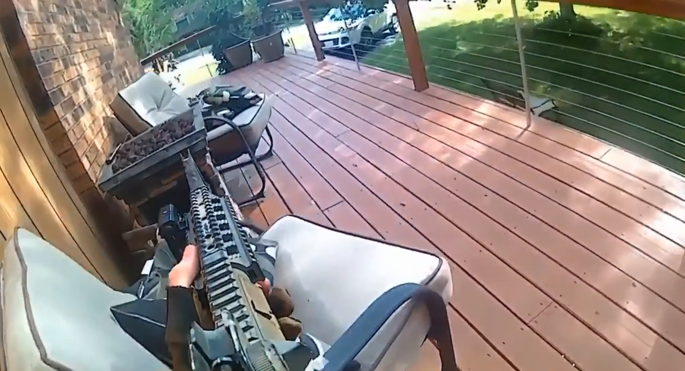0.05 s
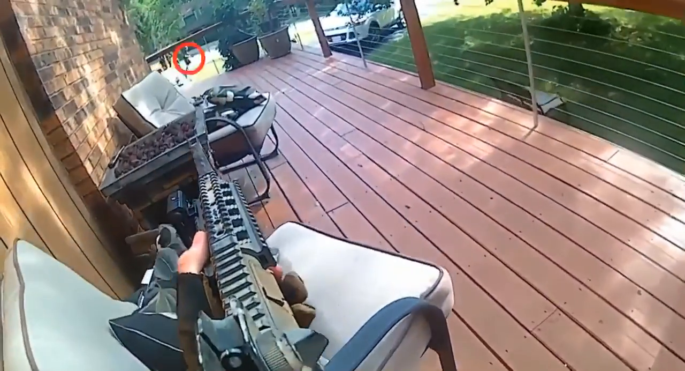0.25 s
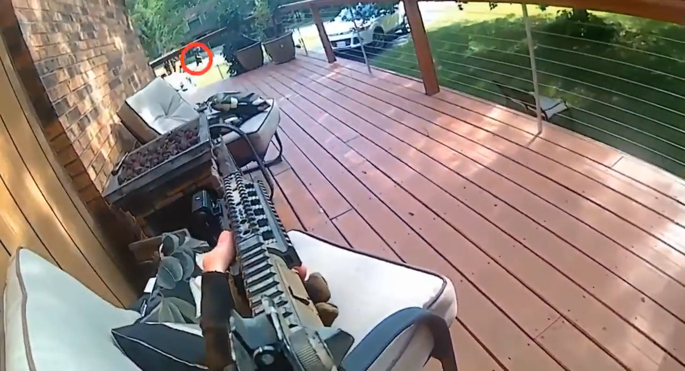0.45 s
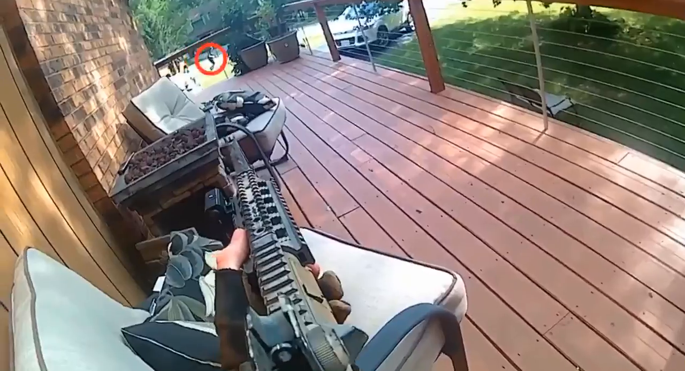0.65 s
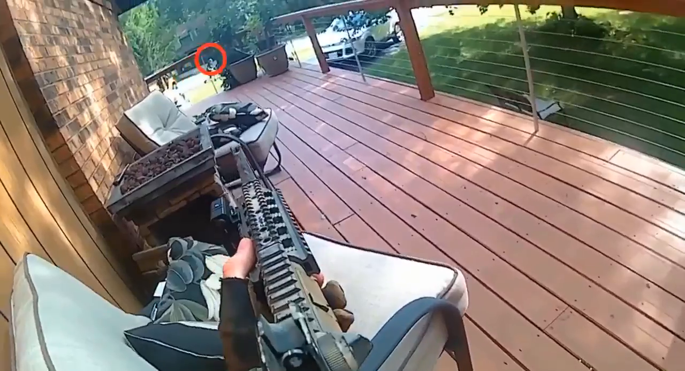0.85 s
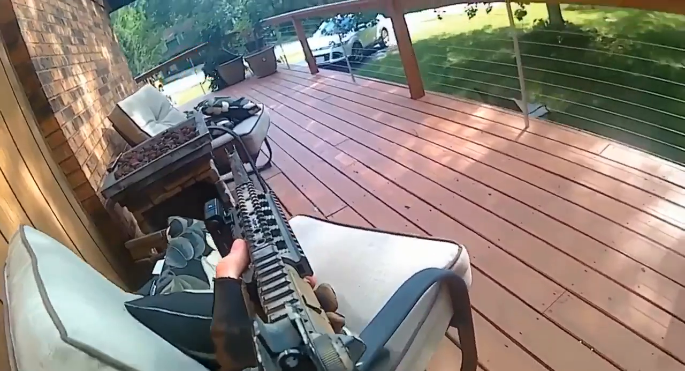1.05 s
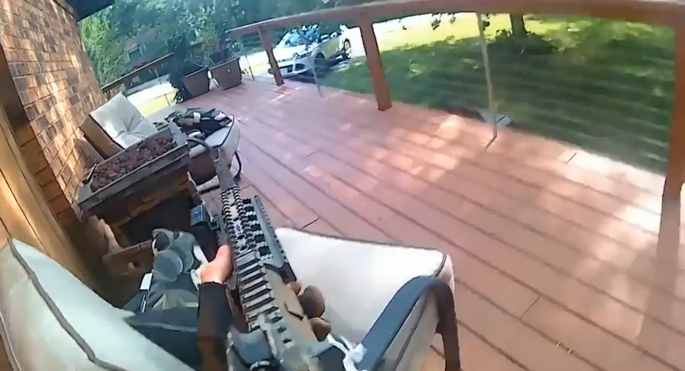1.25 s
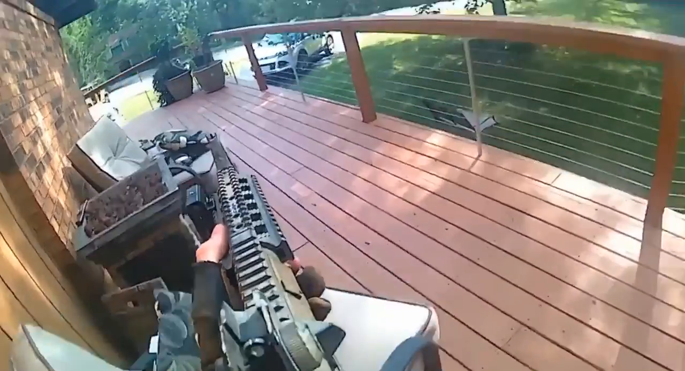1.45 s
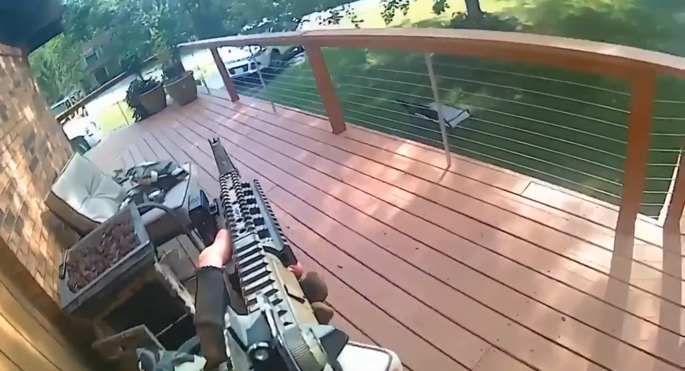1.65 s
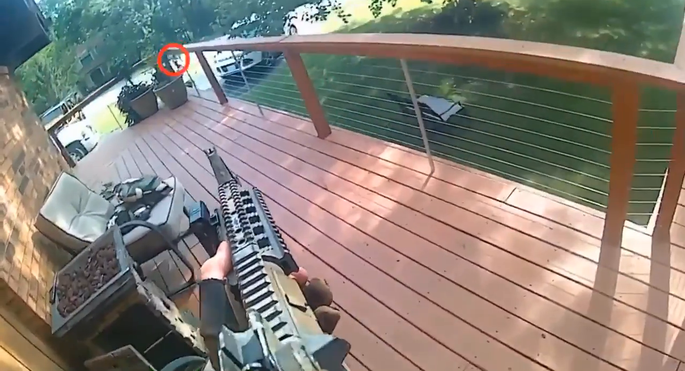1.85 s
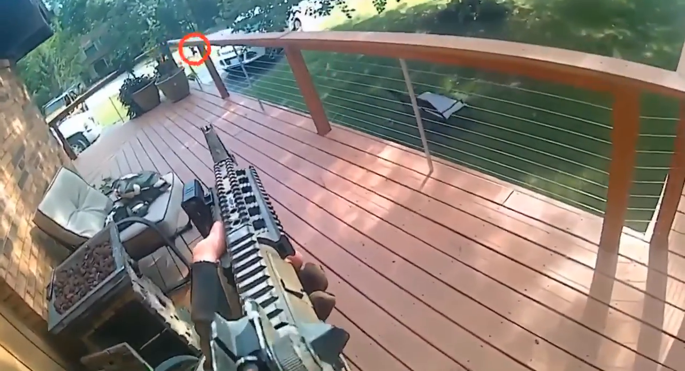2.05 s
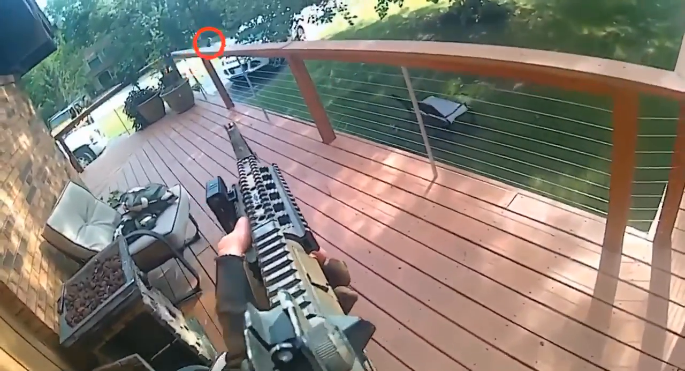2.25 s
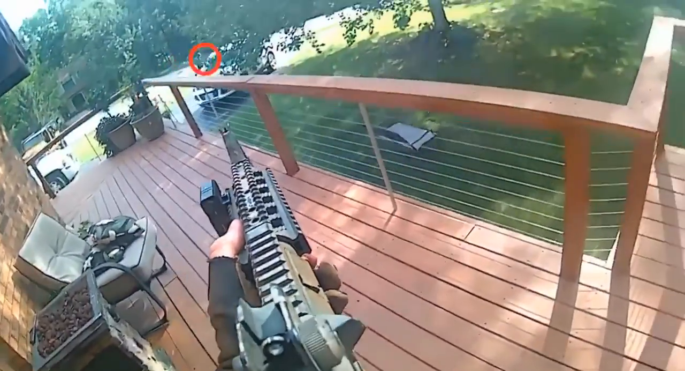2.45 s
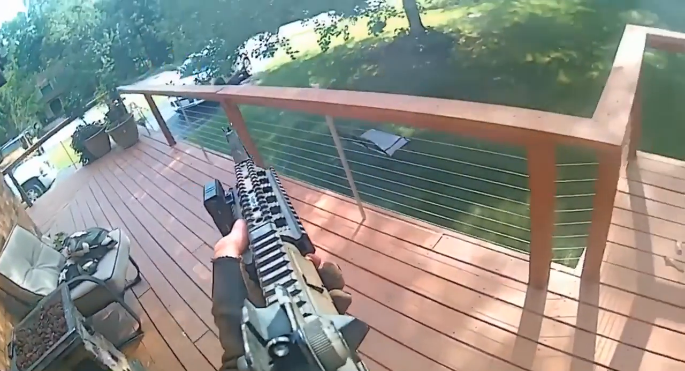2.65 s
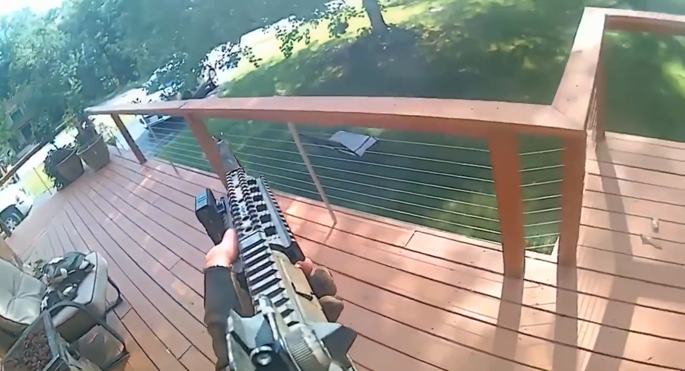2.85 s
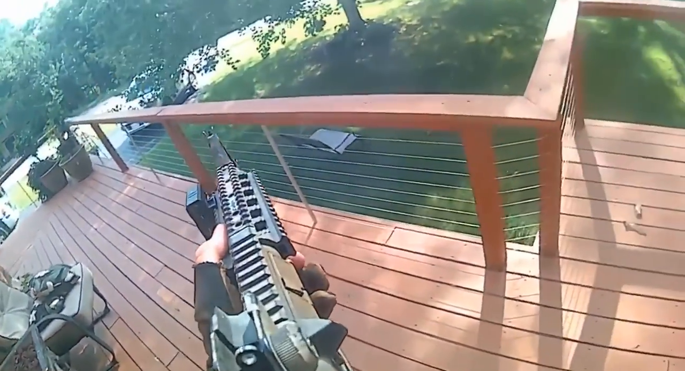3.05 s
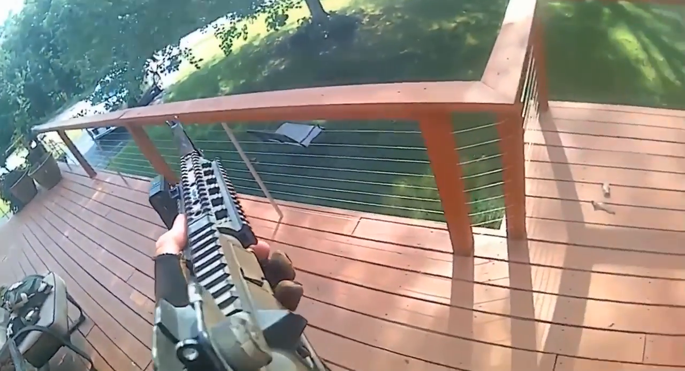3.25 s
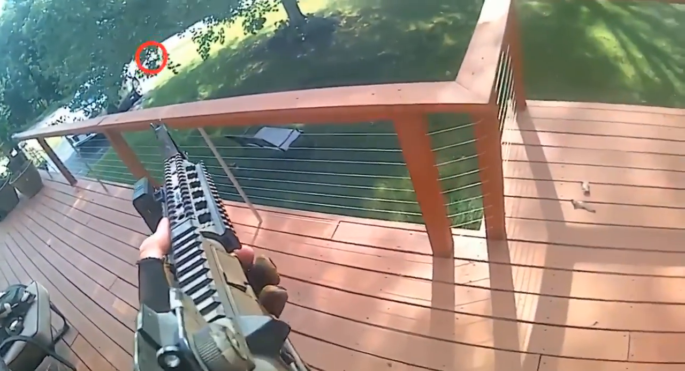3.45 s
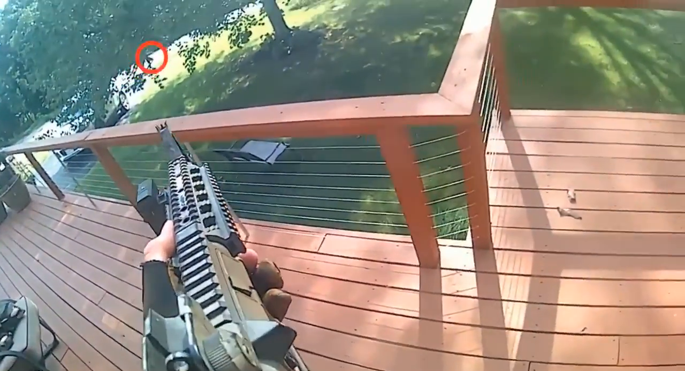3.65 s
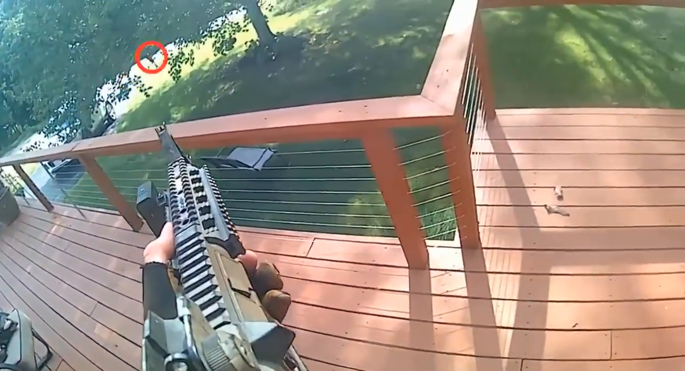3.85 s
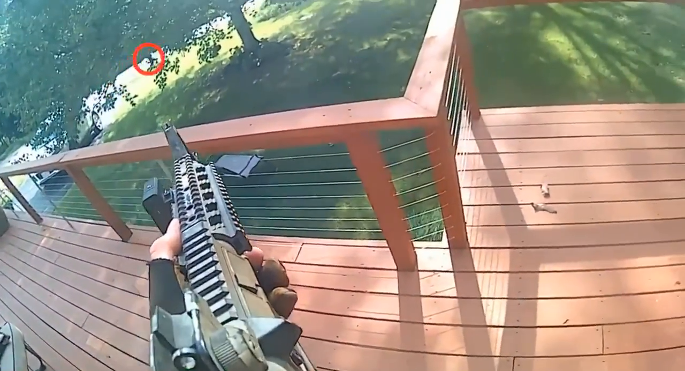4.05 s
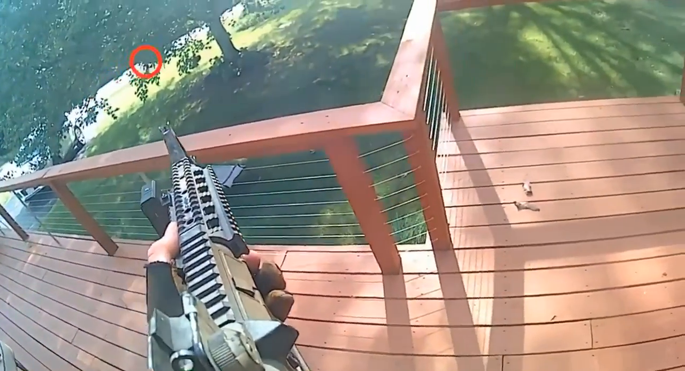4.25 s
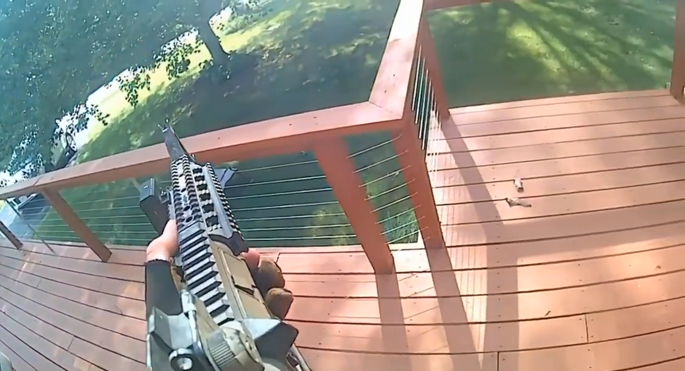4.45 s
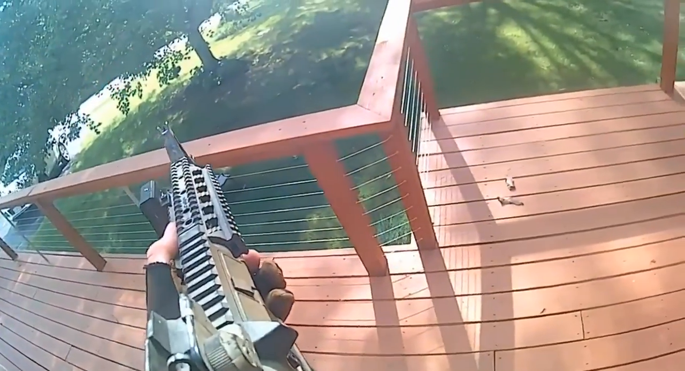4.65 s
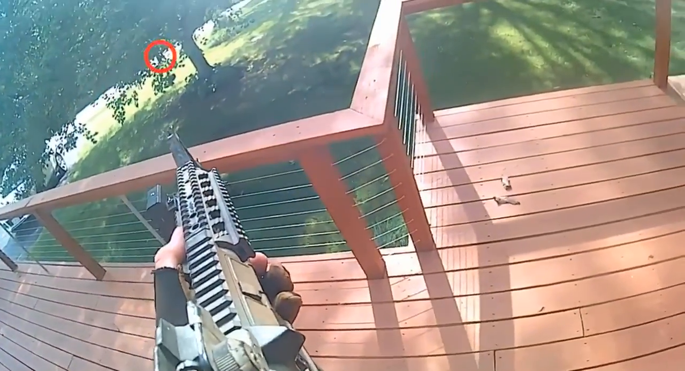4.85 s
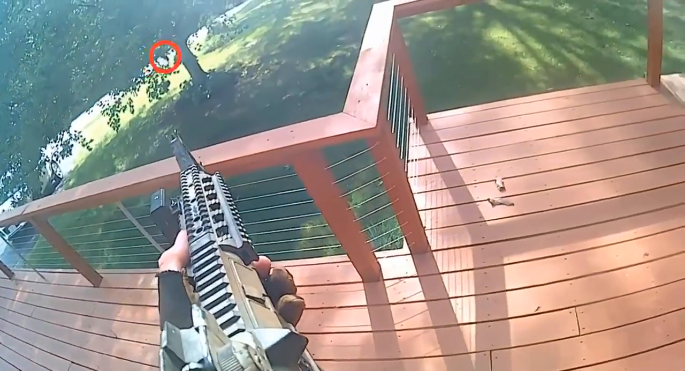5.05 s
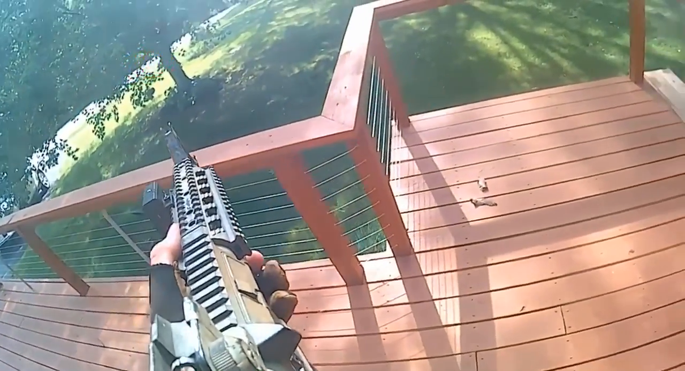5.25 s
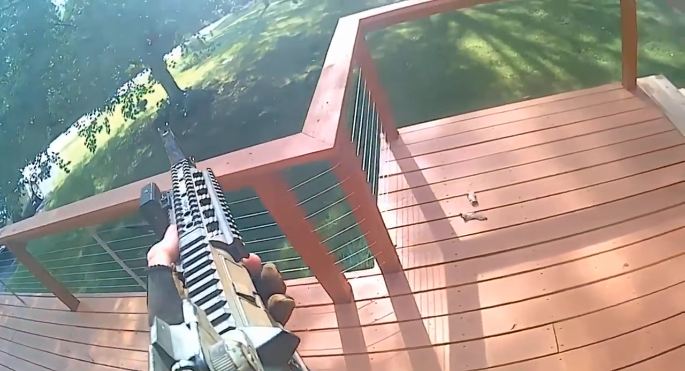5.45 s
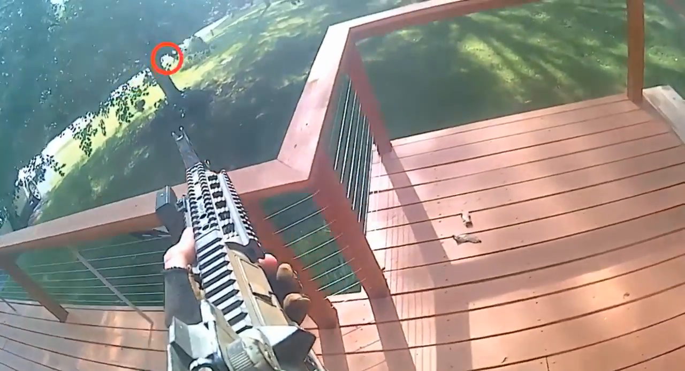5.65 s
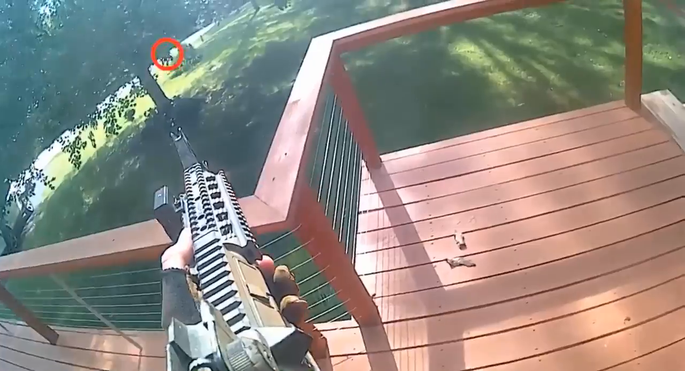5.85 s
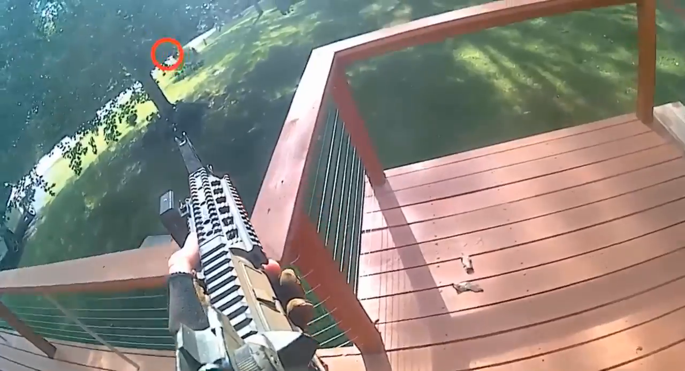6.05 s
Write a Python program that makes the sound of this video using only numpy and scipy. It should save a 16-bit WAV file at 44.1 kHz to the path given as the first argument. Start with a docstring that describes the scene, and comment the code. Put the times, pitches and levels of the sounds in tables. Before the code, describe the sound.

Four strings of dry, plasticky slams with geared motor whine, about five shots a second, very close and slightly overloaded. Between the first two strings the gun is handled: trigger clacks, dull thuds, a small loose rattle. Later pauses are nearly empty, just quiet rumble and thin hiss. The sound is boxy and narrow, with a gritty metallic edge in the treble and only a short, faint answer from deck boards and house wall.

```python
"""Four quick strings of hard slams and pops with whining gears: an electric airsoft rifle on a wooden deck.
The microphone is a head-worn camera's, close above the gun. In each cycle the motor whines up, the piston
slams, the barrel pops and the gears coast: swept tones, grinding noise, noise cracks and struck modes.
Clacks fall among the shots, soft bumps between the first two strings; a low rumble and a hiss lie behind.
The input overloads on the slams, and 8 kHz sampling mirrors the band into the treble."""
import sys
import numpy as np
from scipy import signal
from scipy.fft import rfft, irfft, next_fast_len
from scipy.io import wavfile
from scipy.ndimage import map_coordinates

SR = 44100
rng = np.random.default_rng(int(sys.argv[2]) if len(sys.argv) > 2 else 0)


def generate_wav(sig):
    """Save sig (samples, or channels by samples) to the path in sys.argv[1] as 16-bit PCM at SR."""
    pcm = np.round(np.clip(np.atleast_2d(sig).T, -1, 1) * 32767).astype(np.int16)
    wavfile.write(sys.argv[1], SR, pcm)


N = 269892  # samples

# Levels in the tables are relative: each source sets its own gain on top.
# Slow level curve shared by rumble and hiss, rising as the wearer moves: [t/s, level/dB]
BACKGROUND_LEVEL = [(0.0, -30), (1.11, -25), (1.36, -28), (1.94, -27), (3.1, -34.5), (3.83, -26.5),
                    (4.59, -29), (5.06, -35), (5.56, -26), (6.12, -29)]
# Colour of the low rumble and of the faint hiss: [f/Hz, density/dB per Hz]
RUMBLE_SPECTRUM = [(20, -37), (40, -12.5), (62, 5), (110, 2.5), (150, -4), (200, -4.5), (250, -18.5),
                   (320, -27.5), (600, -32), (1500, -81)]
HISS_SPECTRUM = [(100, -44), (400, -14), (800, -4.5), (1500, -7.5), (2100, -9), (2700, -17), (3300, -22),
                 (4000, -26.5)]
# Decay of the answer from boards and house wall: [f/Hz, t60/s]
DECK_DECAY = [(100, 0.21), (500, 0.15), (1500, 0.16), (4000, 0.045)]

# Clacks of trigger and grip: [t/s, click level/dB, knock level/dB]
CLACKS = [(.985, -16, -19.5), (1.067, -31, -20), (1.899, -17.5, -23), (2.092, -21, -19),
          (2.281, -19.5, -26.5), (3.656, -19.5, -25.5), (4.744, -23, -25.5)]
# Soft bumps against the body: [t/s, tick level/dB, thud level/dB, thud f/Hz before its sag]
BUMPS = [(1.077, -37, -15, 200), (1.155, -45, -21, 112), (1.189, -54, -11.5, 103),
         (1.2421, -17.5, -16, 160), (1.3063, -14.5, -10.5, 164), (1.403, -25.5, -21, 133)]
# Modes of the loose fitting and of the hollow grip: [f/Hz, level/dB, t60/s]
FITTING_MODES = [(813, 0, 0.037), (1280, 0, 0.039), (1561, -6, 0.033), (1920, -8, .04)]
GRIP_MODES = [(240, -3.5, 0.18), (339.7, 0.5, 0.097), (455, 0.5, 0.034)]
# Colour of a click: [f/Hz, density/dB per Hz]
CLICK_SPECTRUM = [(200, -7), (780, -4.5), (1450, 5.5), (2100, -3), (2600, -32), (3200, -16.5), (4000, -39)]

# Every shot: [t/s of the slam, slam level/dB, low boom level/dB]
SHOTS = [(.184, -10.5, -20), (0.3704, -8, -24), (0.5519, -9.5, -23), (0.7287, -12, -22),
         (0.8871, -9.5, -28), (1.5887, -10, -23.5), (1.788, -11, -20.5), (1.9837, -10, -14.5),
         (2.1774, -9.5, -17), (3.5452, -13.5, -22.5), (3.746, -11, -21), (3.9361, -10, -37),
         (4.1141, -8, -37), (4.2925, -8.5, -29), (4.471, -9, -27), (4.6339, -8.5, -25.5),
         (5.3218, -12.5, -28), (5.5455, -12.5, -22.5), (5.7486, -9, -23), (5.947, -10, -35),
         (6.133, -21, -22)]
# Modes of the barrel's air and of the receiver's shell: [f/Hz, level/dB, t60/s]
BARREL_MODES = [(215, -3, .04), (365, -11, .09), (730, -7, .024), (985, -2, .032), (1275, 0, .032),
                (1490, -6, .04), (1895, -12, .03), (2125, -12, .032)]
SHELL_MODES = [(1260, -3, .012), (1900, -5, .015), (2130, -6, .015), (2650, 0, .014), (2880, -1, .014),
               (3170, -7, .013)]
# Colour of the slam's crack, and of the gearbox noise and resonances: [f/Hz, density/dB per Hz]
SLAM_SPECTRUM = [(100, -49.5), (450, -10), (750, 5.5), (1250, -11), (1650, 0), (2050, -38.5), (2350, 0.5),
                 (2700, 1.5), (2950, -6), (3300, -10.5), (3600, -26), (4000, -9)]
GEARBOX_SPECTRUM = [(100, -43), (230, -14.5), (370, -1.5), (520, -15), (720, -19.5), (1000, -10),
                    (1250, -6), (1480, -2.5), (1650, -7.5), (2100, -9.5), (2260, -11.5), (2400, -23.5),
                    (2750, -14), (3150, -10.5), (3320, -15.5), (3480, -32.5), (3800, -21)]
# Gear tones: [multiple of the shaft rate, level/dB]
GEAR_TONES = [(1, -13.5), (2, -19.5), (3, -8.5), (4, 1.5), (5, -8.5), (6, -16.5), (7, -16), (8, 3),
              (9, -18.5)]

# What the camera's coarse interpolation lets through: [f/Hz, level/dB]
IMAGE_RESPONSE = [(3900, 0), (4750, -1), (6000, -19), (7400, -34), (7750, -54), (8000, -72), (8250, -56),
                  (8600, -38), (10000, -28), (11200, -16), (12800, -18), (14400, -37), (15400, -36),
                  (15900, -70)]
SAMPLE_HZ, TOP_HZ = 8000, 16400

# Gains on the background level; the hiss swings wider in dB than the rumble
RUMBLE_DB, HISS_DB, HISS_SWING = 2, -24, 1.1
CLACK_T60_S, TICK_T60_S, TICK_KNOCK_DB = 0.028, 0.0036, -13
CLINK_S, CLINK_DB = 1.152, -23

# The motor starts PULL_S before the slam; run-up and coasting are time constants
PULL_S, RUN_UP_S, SHAFT_HZ, COAST_S = 0.077, 0.02, 432.5, 0.2
# Grinding: level at the slam, growth as the spring is squeezed, fall while coasting
GRIND_DB, LOAD_DB_PER_S, GRIND_FALL_DB_PER_S = -26, 67.5, 73
SHAKE_DB, SHAKE_T60_S = -18, 0.055  # the slam shakes the gear train
# Whine: level, growth of overtones with speed, loss under load and the time that loss takes
WHINE_DB, BRIGHTEN, STRAIN_DB, STRAIN_S = -21.5, 0.34, 14.5, 0.031
FREE_DB, WHINE_FALL_DB_PER_S = -31, 66.5  # whine once the spring lets go
STOP_S, STOP_T60_S = 0.12, 0.26  # after the slam, the gears come to rest
SPRING_HZ, SPRING_DB, SPRING_T60_S = 1466, -22.5, 0.32  # the stopping gears damp it further
# Dull knocks: the piston slips off the gear before the slam and rebounds after it
SLIP_S, SLIP_DB, REBOUND_S, REBOUND_DB = 0.00634, -11, 0.039, -14.5


def amp(db):
    """Amplitude of a level in dB."""
    return 10 ** (np.asarray(db) / 20)


def unit(x):
    """Scale to rms 1."""
    return x / np.sqrt(np.mean(x ** 2) + 1e-20)


def along(points, hz):
    """Read (Hz, value) points on a log frequency axis."""
    f, v = np.transpose(points)
    return np.interp(np.log(hz + 1), np.log(f + 1), v)


def filtered(x, response):
    """Multiply the spectrum of x by a function of frequency."""
    m = next_fast_len(len(x) + 8192)
    spectrum = rfft(x, m) * response(np.fft.rfftfreq(m, 1 / SR))
    return irfft(spectrum, m)[:len(x)]


def noise(spectrum, size):
    """Steady coloured noise of rms 1."""
    return unit(filtered(rng.standard_normal(size), lambda hz: amp(along(spectrum, hz))))


def wobble(size, rate):
    """A smooth random curve of rms about 1, with rate knots a second."""
    knots = rng.standard_normal(int(size * rate / SR) + 4)
    return map_coordinates(knots, [np.arange(size) * rate / SR])


def fade(t, attack, t60):
    """A blow's envelope: silent before t = 0, a quick rise, an even decay."""
    t = np.maximum(t, 0)
    return (1 - np.exp(-t / attack)) * amp(-60 * t / t60)


def burst(spectrum, t, attack, t60):
    """A crack of noise: the phases of a decaying random blow under a fixed colour and energy."""
    envelope = fade(t, attack, t60)
    size = next_fast_len(len(t))
    phase = np.angle(rfft(rng.standard_normal(len(t)) * envelope, size))
    colour = amp(along(spectrum, np.fft.rfftfreq(size, 1 / SR)))
    crack = irfft(colour * np.exp(1j * phase), size)[:len(t)]
    # a loose second envelope keeps silence ahead of the blow
    crack = crack * fade(t, attack / 2, 10 * t60)
    return unit(crack) * np.sqrt(np.mean(envelope ** 2))


def ring(modes, t, attack, scatter_db):
    """Struck modes of alternating sign, at slightly new strengths and pitches each time."""
    total = np.zeros(len(t))
    for k, (hz, db, t60) in enumerate(modes):
        strength = (-1) ** k * amp(db + scatter_db * rng.normal())
        pitch = hz * (1 + 0.0083 * rng.normal())
        total += strength * fade(t, attack, t60) * np.sin(2 * np.pi * pitch * t)
    return total


def add(track, s, sound):
    """Mix a sound into the track from s seconds on."""
    start = max(round(s * SR), 0)
    room = track[start:start + len(sound)]
    room += sound[:len(room)]


def background():
    """One slow level curve, rising as the wearer moves, drives a low rumble and a faint hiss."""
    knot_s, knot_db = np.transpose(BACKGROUND_LEVEL)
    level_db = np.interp(np.arange(N) / SR, knot_s, knot_db)
    hiss_db = level_db.mean() + HISS_SWING * (level_db - level_db.mean()) + HISS_DB
    rumble = amp(level_db + RUMBLE_DB) * noise(RUMBLE_SPECTRUM, N)
    return rumble + amp(hiss_db) * noise(HISS_SPECTRUM, N)


def deck(x):
    """Boards and house wall answer after 1/140 s with a short diffuse tail, its decay set by frequency."""
    hz, t, cells = signal.stft(rng.standard_normal(SR // 3), SR, nperseg=256)
    decay = amp(-60 * t / along(DECK_DECAY, hz)[:, None])
    tail = signal.istft(cells * decay, SR, nperseg=256)[1]
    delayed = np.pad(x, (SR // 140, 0))
    return signal.fftconvolve(delayed, tail / np.linalg.norm(tail))[:N]


def clack(t, click_db, knock_db):
    """Trigger and grip: a noise click over a hollow knock of the grip's modes."""
    click = amp(click_db - 2.5) * burst(CLICK_SPECTRUM, t, 0.00017, CLACK_T60_S)
    return click + amp(knock_db + 1.5) * ring(GRIP_MODES, t, 0.0051, scatter_db=4)


def bump(t, tick_db, thud_db, thud_hz):
    """Gun against body: a tick and a soft thud sagging from 1.6 towards 0.4 times its pitch."""
    tick = burst(CLICK_SPECTRUM, t, 0.00025, TICK_T60_S)
    tick = tick + amp(TICK_KNOCK_DB) * ring(GRIP_MODES, t, 0.0019, scatter_db=2.5)
    swell = fade(t, 0.014, 0.085) ** 2  # squared: a softer rise, a decay twice as fast
    sag = np.cumsum(0.4 + 1.2 * np.exp(-t / 0.013)) / SR
    thud = swell / swell.max() * np.sin(2 * np.pi * thud_hz * sag)
    return amp(tick_db) * tick + amp(thud_db) * thud


def clink(t):
    """A loose fitting on the gun: its ringing modes with a noise click."""
    click = amp(-4) * burst(CLICK_SPECTRUM, t, 0.001, CLACK_T60_S)
    return amp(CLINK_DB) * (ring(FITTING_MODES, t, 0.002, scatter_db=1) + click)


def handling():
    """Place the clacks, the bumps and the one clink."""
    track, t = np.zeros(N), np.arange(SR // 4) / SR
    for s, *levels in CLACKS:
        add(track, s, clack(t, *levels))
    for s, *settings in BUMPS:
        add(track, s, bump(t, *settings))
    add(track, CLINK_S, clink(t))
    return track


def gearbox(t):
    """The motor runs up against the spring and coasts after the slam (t = 0); its gears whine and grind."""
    driven = np.maximum(t + PULL_S + 0.002 * rng.normal(), 0)
    coasting = np.maximum(t, 0)
    speed = (1 - np.exp(-driven / RUN_UP_S)) * np.exp(-coasting / COAST_S)
    shaft_hz = SHAFT_HZ * (1 + 0.009 * rng.normal()) * speed
    turning = (1 - np.exp(-driven / 0.0029)) * amp(-60 * np.maximum(t - STOP_S, 0) / STOP_T60_S)

    # the spring keeps the teeth pressed together; once it lets go they chatter
    unsteady = np.where(t < 0, 0.005, 0.045)
    turns = np.cumsum(shaft_hz * (1 + unsteady * wobble(len(t), rate=540))) / SR

    # worn teeth make every tone waver in strength; higher tones need more speed
    tones = np.zeros(len(t))
    for k, db in GEAR_TONES:
        strength = amp(db + 2.36 * wobble(len(t), rate=150)) * speed ** (BRIGHTEN * k)
        tones += strength * np.sin(2 * np.pi * (k * turns + rng.random()))
    strain = np.clip(1 + t / STRAIN_S, 0, 1)
    loaded = amp(WHINE_DB - STRAIN_DB * strain)
    free = amp(FREE_DB - WHINE_FALL_DB_PER_S * coasting)
    # each tone swells as it sweeps through a resonance of the shell
    whine = filtered(tones * np.where(t < 0, loaded, free), lambda hz: amp(along(GEARBOX_SPECTRUM, hz)))

    # the grinding comes in small lumps and pulses once a turn
    lumps = amp(2.0 * wobble(len(t), rate=135.8)) * (1 + 0.25 * np.sin(2 * np.pi * turns))
    load_db = GRIND_DB + LOAD_DB_PER_S * np.minimum(t, 0) - GRIND_FALL_DB_PER_S * coasting
    grind_level = amp(load_db) + amp(SHAKE_DB) * fade(t, 0.0018, SHAKE_T60_S)
    grinding = np.sqrt(speed) * grind_level * lumps * noise(GEARBOX_SPECTRUM, len(t))

    # the slack spring sings on at one pitch
    spring_level = amp(SPRING_DB) * fade(t, 0.01, SPRING_T60_S) * wobble(len(t), rate=90)
    spring = spring_level * np.sin(2 * np.pi * SPRING_HZ * t)
    gears = turning * (grinding + whine + spring)

    # unloaded, slowing teeth meet softly and lose their treble
    soft = filtered(gears, lambda hz: 1 / (1 + (hz / 2900) ** 10))
    slack = np.interp(t, [0.035, 0.09], [0, 0.75])
    return (1 - slack) * gears + slack * soft


def knocks(t):
    """The piston knocks the grip's modes as it slips off the gear and again as it rebounds."""
    slip = amp(SLIP_DB) * ring(GRIP_MODES, t + SLIP_S, 0.00079, scatter_db=3)
    slip = slip * fade(t + SLIP_S, 0.0005, 0.017)
    rebound_t = t - REBOUND_S - 0.002 * rng.normal()
    return slip + amp(REBOUND_DB) * ring(GRIP_MODES, rebound_t, 0.0076, scatter_db=1)


def kick(t):
    """The slam shoves the whole gun: one short, low push."""
    return amp(5.5) * fade(t - 0.003, 0.00037, 0.027) * np.sin(2 * np.pi * 170 * (t - 0.003))


def boom(t):
    """The recoil leaves a low note ringing in the gun and its holder."""
    hz = 101 * (1 + 0.013 * rng.normal())
    note = fade(t - 0.004, 0.0073, 0.3) * np.sin(2 * np.pi * hz * (t - 0.002))
    # so small a body radiates no deep bass
    highpass = signal.butter(2, 45, "high", fs=SR, output="sos")
    return amp(9.5) * signal.sosfilt(highpass, note)


def piston(t):
    """The piston slips off the gear and slams home, air pops from the muzzle; a click follows at about 34 ms."""
    release = amp(-8) * burst(CLICK_SPECTRUM, t + 0.0082 + 0.004 * rng.normal(), 0.0005, 0.033)
    crack = amp(5.5) * burst(SLAM_SPECTRUM, t + 0.00055, 0.00042, 0.016)
    shell = ring(SHELL_MODES, t + 0.00042, 0.00019, scatter_db=-1.5)
    pop = amp(1.5) * ring(BARREL_MODES, t - 0.0022, 0.0007, scatter_db=2.5)
    click_level = amp(-10 + 2 * rng.normal())
    late_click = click_level * burst(CLICK_SPECTRUM, t - 0.034 - 0.001 * rng.normal(), 0.0005, 0.02)
    return release + crack + shell + pop + late_click


def rifle():
    """One cycle for each shot; the last is cut off after the motor's run-up."""
    track, t = np.zeros(N), np.arange(-SR // 10, SR // 3) / SR
    for s, slam_db, boom_db in SHOTS:
        slam = amp(slam_db) * (piston(t) + kick(t) + knocks(t))
        add(track, s + t[0], slam + amp(boom_db) * boom(t) + gearbox(t))
    return track


def scene():
    """The gun close by, its answer from the deck, and the background."""
    gun = rifle() + handling()
    answer = amp(-22) * deck(gun)
    return (gun + answer + background())[None]


def record(dry):
    """The input overloads softly; sampling then mirrors the band below 4 kHz around 8 and 16 kHz."""
    t = np.arange(N) / SR
    ceiling = amp(-3)
    rounded = dry[0] / (1 + np.abs(dry[0] / ceiling) ** 4) ** (1 / 4)

    def input_band(hz):
        """A steep edge below half the sampling rate and a gentle loss of bass around 30 Hz."""
        return np.clip((SAMPLE_HZ / 2 - hz) / 100, 0, 1) * hz ** 2 / (hz ** 2 + 30 ** 2)

    band = filtered(rounded, input_band)
    # the first terms of a sampling comb make the mirror images
    comb = 1 + 2 * np.cos(2 * np.pi * SAMPLE_HZ * t) + 2 * np.cos(2 * np.pi * 2 * SAMPLE_HZ * t)
    return filtered(band * comb, lambda hz: amp(along(IMAGE_RESPONSE, hz)) * (hz < TOP_HZ))[None]


dry = scene()
out = record(dry)
generate_wav(out)
```